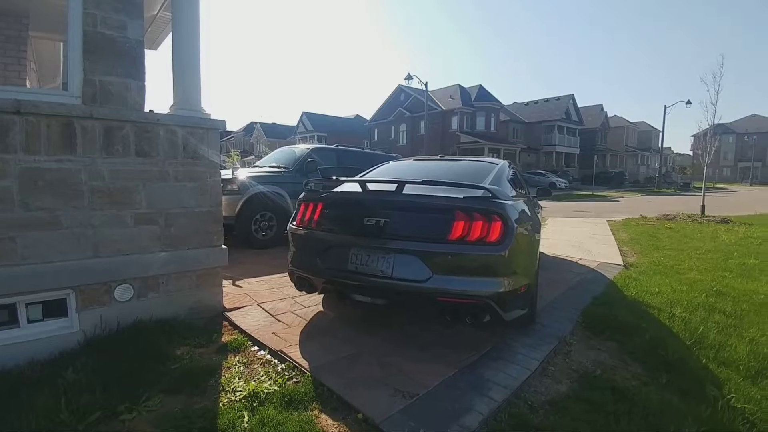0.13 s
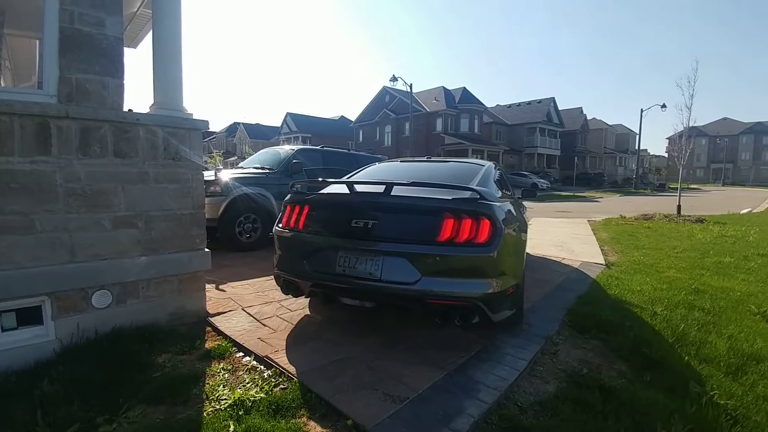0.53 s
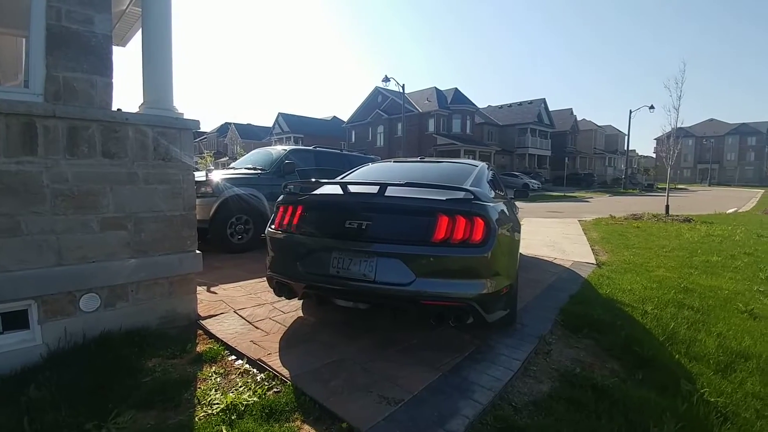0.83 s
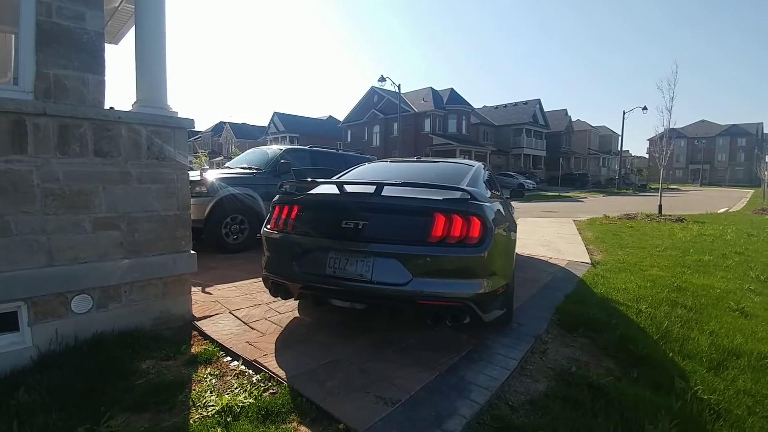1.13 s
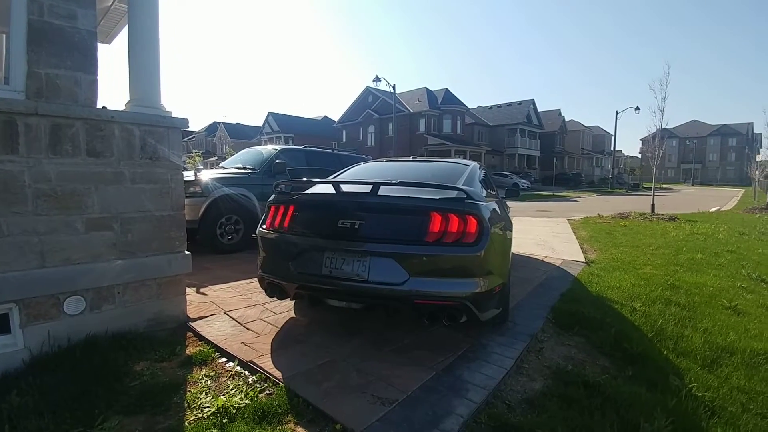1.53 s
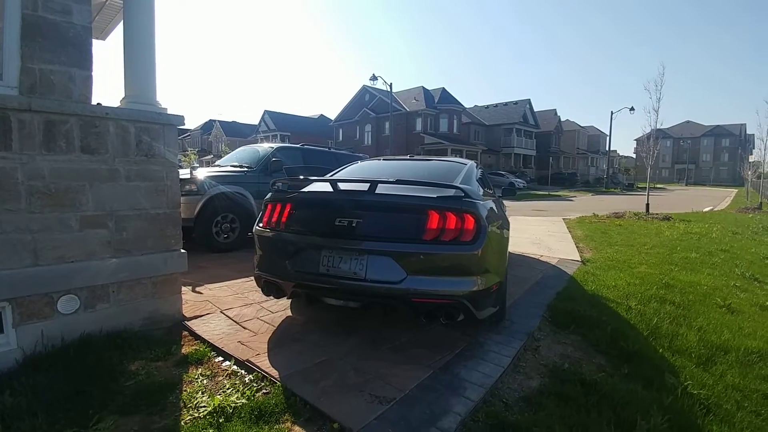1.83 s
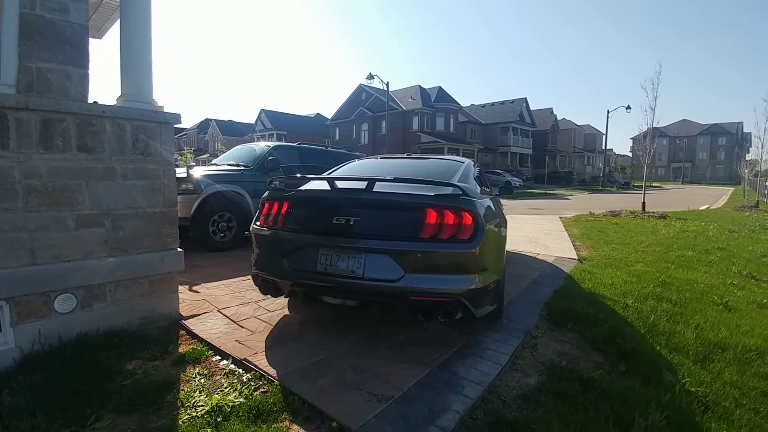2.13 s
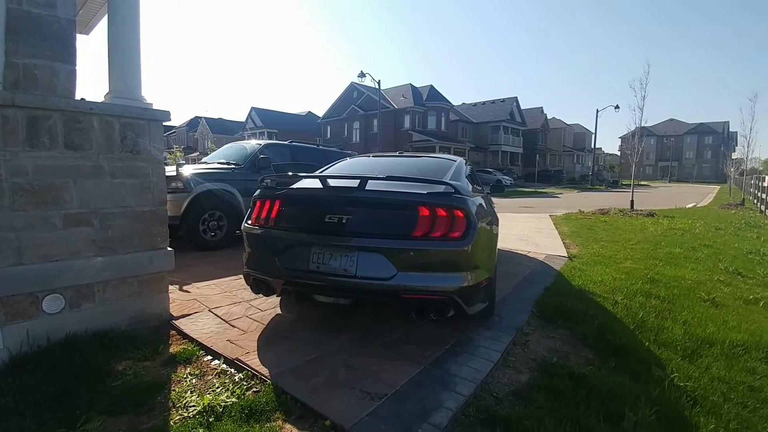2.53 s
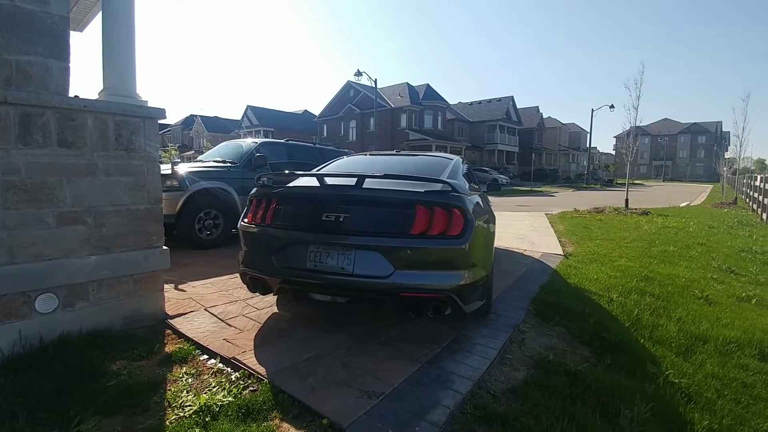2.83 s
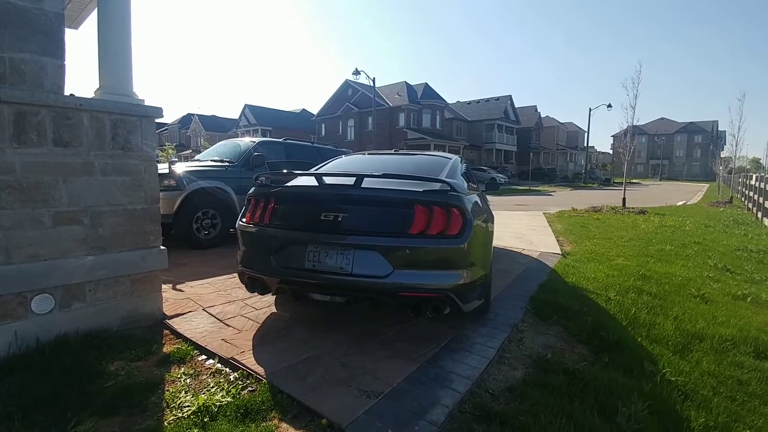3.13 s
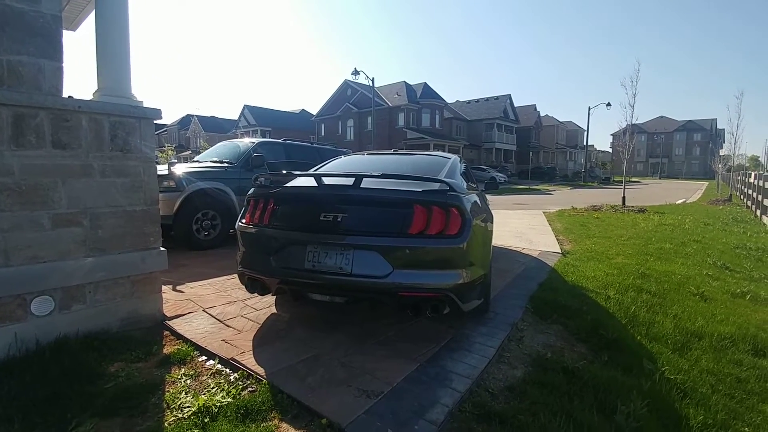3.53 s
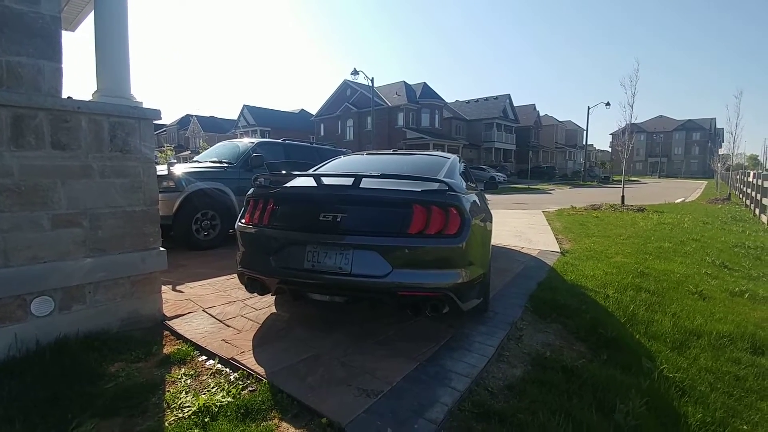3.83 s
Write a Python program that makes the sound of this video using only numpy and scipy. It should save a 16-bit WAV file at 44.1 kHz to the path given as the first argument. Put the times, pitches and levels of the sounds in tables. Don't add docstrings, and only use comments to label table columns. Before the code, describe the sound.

A V8 car starts outdoors: quiet distant traffic and small dry ticks, then a starter clunk, quickening cranking, and an explosive exhaust bark at the end, heard by a stereo phone a few metres behind.

```python
import sys
import numpy as np
from scipy import signal
from scipy.fft import rfft, irfft
from scipy.io import wavfile
from scipy.ndimage import uniform_filter1d

SR = 44100
rng = np.random.default_rng(int(sys.argv[2]) if len(sys.argv) > 2 else 0)


def to_wav(s):
    ch = np.atleast_2d(s).T
    pcm = np.round(np.clip(ch, -1, 1) * 32767)
    wavfile.write(sys.argv[1], SR, pcm.astype(np.int16))


def magnitude_from_level(level_db):
    exponent = np.asarray(level_db, float) / 20
    return 10 ** exponent


N = 176400

# [t/s, level/dB]
TRAFFIC_SWELL = [
    (0.06, -39.5),
    (0.52, -40.5),
    (0.93, -40),
    (1.769, -36.5),
    (1.78, -38),
    (2.56, -35.5),
    (2.799, -33.5),
]
# [f/Hz, level/dB]
WASH_TONE = [(140, -9), (230, -15), (351, -6.5), (434, -4.5), (818, 0), (1270, -14), (1710, -12.5),
             (2810, -31), (15500, -52)]
# [f/Hz, level/dB]
ROAD_TONE = [(15, -62), (25, -36), (45, -22.5), (70, -4), (145, -5.5), (178, -2), (330, -21), (430, -45),
             (730, -120)]
# [f/Hz, level/dB]
HISS_TONE = [(2500, -12), (4000, -20.5), (7000, 11), (11000, 9), (15500, -15)]
# [f/Hz, wander/Hz, level/dB]
FAR_ENGINE = [(90.26, 2.55, -40.5), (175.1, 1.453, -41), (358, 4.2, -49)]
# [f/Hz, likeness/0-1]
LIKENESS = [(60, 0.8), (240, 1), (950, 0.01), (3770, 0), (15000, 0.4)]
ROAD_DB, HISS_DB, TRAFFIC_PAN_DB, PATCHY_DB = -39.5, -65, 1.13, 0.8
RUMBLE_HZ, RUMBLE_WIDTH_HZ, RUMBLE_DB = 72.4, 30, -35.5
INSECT_HZ, INSECT_WIDTH_HZ, INSECT_DB, INSECT_END_S = 10100, 900, -68, 0.6

# [t/s, length/s, f/Hz, level/dB]
PEEPS = [
    (1.048, 0.046, 7000, -65.5),
    (1.554, 0.068, 6850, -57),
]
# [t/s, peak level/dB, f/Hz, pan/dB]
TWIGS = [
    (1.353, -30, 1500, 12),
    (1.475, -20, 10400, -5),
    (1.506, -33, 6650, -8),
    (1.578, -29, 7240, -11),
    (1.707, -21, 9000, -8),
    (1.7912, -30, 5800, -10),
    (1.8787, -20.5, 10900, 4),
    (1.9045, -23.5, 7800, 1),
    (2.731, -18.5, 1900, -5),
    (2.741, -16, 1510, -1),
]
TICK_CYCLES, CRACKLE_CYCLES = 4.0, 40

# [f/Hz, width/Hz, level/dB]
PUMP = [(4500, 500, 8), (7000, 940, 12.5)]
PUMP_START_S, PUMP_RISE_S, PUMP_DB = 1.9, 0.98, -66
# [f/Hz, level/dB]
SLAM_TONE = [(180, -46), (300, -25), (1110, -7), (1390, -15), (1540, -18), (2400, -14.5), (3810, -19.5),
             (7620, -9), (15500, -28.5)]
# [f/Hz, width/Hz, level/dB]
CLUNK = [(1117, 60, -7), (1580, 19, -12.5), (2450, 92, -15)]
SLAM_S, SLAM_DB, SLAM_ATTACK_S, SLAM_HOLD_S, SLAM_T60_S = 2.856, -17, 0.014, 0.014, 0.11
# [t/s, whirr level/dB]
STROKES = [(2.94, -34), (3.094, -25.5), (3.222, -24), (3.325, -22), (3.419, -22.5), (3.499, -23),
           (3.582, -21), (3.661, -23.5), (3.69, -23.5), (3.75, -12.5), (3.80, -21.5)]
STROKE_ATTACK_S, STROKE_T60_S, STROKE_DB = 0.0075, 0.18, -4.5
# [f/Hz, level/dB]
WHIRR_TONE = [(240, -42), (400, -9), (488, -5.5), (543, -48), (914, -1.5), (3970, -21.5), (6990, -13),
              (9070, -15.5), (15500, -31.5)]
# [f/Hz, width/Hz, level/dB]
HOUSING = [(576, 14, -38.5), (876, 18, -38.5), (1100, 95, -40), (1995, 45, -50), (2910, 110, -46.5),
           (7000, 230, -37)]
# [f/Hz, wander/Hz, level/dB]
WHINE = [(490, 3.0, -36.5), (595, 20.0, -45)]
WHIRR_DB, RELEASE_S, SPIN_DOWN_S = -33, 3.86, 0.054
STARTER_PAN_DB, STARTER_LIKENESS = 1.8, 0.086
# [t/s, f/Hz, level/dB]
MESH = [
    (2.92, 1041, -42.5),
    (3.076, 1086, -35),
    (3.212, 983.9, -47),
    (3.222, 1199, -41),
    (3.322, 983.9, -37),
    (3.374, 1235, -40),
    (3.464, 981, -49),
    (3.638, 1120, -50),
    (3.65, 990, -47),
]
MESH_OVERTONE, MESH_OVERTONE_DB = 1.75, -8
# [t/s, f/Hz, peak level/dB, t60/s]
PUFFS = [
    (3.092, 54, -17.5, 0.16),
    (3.222, 55.6, -24, 0.1),
    (3.245, 155.6, -24, 0.12),
    (3.295, 73, -23, 0.095),
    (3.425, 155, -25.5, 0.15),
    (3.47, 149.6, -29.5, 0.19),
    (3.479, 67, -23, 0.093),
    (3.565, 58, -21, 0.14),
    (3.621, 68, -20.5, 0.15),
]

# [t/s, crack level/dB, thump level/dB, spit
# level/dB, extra depth level/dB]
CATCHES = [(3.660, -4.5, -12.5, -15.5, -12), (3.670, -13, -20, -26, 15), (3.689, 3.5, -15, -22, -10),
           (3.696, 0.5, -9, -31, -4), (3.712, -2.5, -10.5, -18, -5), (3.7205, -14, -10, -31, -6),
           (3.729, -6, -5, -22.5, 1.5), (3.745, 3, -4.5, -13, 1.5), (3.758, 10, -7.5, -17, -9),
           (3.775, 7.5, -10.5, -13, -4), (3.786, 10.5, -9, -17.5, -3), (3.798, 7, -9, -13, -1),
           (3.811, 4.5, -4, -19, 0), (3.821, 5, -5, -20, -5.5), (3.831, 3, -10, -17.5, -7)]
# [crack level/dB, thump level/dB, spit level/dB]
CYLINDERS = [(-4.5, 0, -4), (4, 2, 4), (-3, -1, 2), (5, 2.5, -10), (0, -1, 0), (4, 6, -6), (-4, 3, -5),
             (2, 0, -3)]
STEADY_S, STEADY_COUNT = 3.8415, 18
FIRING_HZ, GAIN_HZ_PER_S, FIRING_JITTER_S = 105.9, 58, 0.0004
STEADY_CRACK_DB, STEADY_THUMP_DB, STEADY_SPIT_DB, STEADY_DEPTH_DB = 6.5, -10, -16.5, -6.5
CRACK_GROWTH_DB, THUMP_GROWTH_DB, SPIT_GROWTH_DB = 0.5, 0.18, 0.38
# [f/Hz, level/dB, t60/s]
BOOM = [(58, 7.5, 0.11), (133, -3.5, 0.09), (171, 1.5, 0.057), (188.5, 0, 0.082), (225.2, 3, 0.072),
        (288, 0, 0.09), (362, -11, 0.035)]
# [f/Hz, level/dB, t60/s]
CRACK = [(500, -4, 0.035), (647, -4, 0.033), (807, 2, .016), (1020, 4, 0.02), (1200, -6.5, 0.014),
         (1568, -11, 0.032), (3490, -11, 0.022)]
# [f/Hz, level/dB, t60/s]
TIPS = [(2308, -2.5, 0.0094), (2573, -4, 0.011)]
# [delay/s, left level/dB, right level/dB]
ECHOES = [(.0043, -11, -22), (.011, -5.5, -20), (.027, -10, -7.5)]
BOOM_LAG_S, BOOM_SCATTER_DB, PUSH_S = 0.0018, 2.8, 0.00045
CRACK_STAGGER_S, SCATTER_DB, PIPE_SPREAD_DB = 0.001613, 3, 3
RASP_DB, RASP_T60_S, RASP_CUT_HZ, RASP_SIDE = -13, 0.025, 1020, 0.21
JET_DB, JET_T60_S = -32, 0.033
SPIT_HZ, SPIT_WIDTH_HZ, SPIT_T60_S, SPIT_PAN_DB = 2510, 380, 0.03, 1.5
EXHAUST_PAN_DB = 0.2

# [f/Hz, width/Hz, level/dB]
MIC_COLOUR = [(417, 70.6, -8.5), (1200, 450, -1.5), (2380, 140, 1.5), (3200, 2100, -1.5),
              (9000, 1080, -11.5), (14150, 6340, -10)]
# [f/Hz, width/Hz, left minus right level/dB]
PORT_BALANCE = [(2190, 1700, 5.5), (4970, 6500, -5), (13700, 7300, 12.5)]
OPEN_S, OPEN_FADE_S, MIC_LOW_HZ = 0.037, 0.012, 47.4
LIMIT, LIMIT_RELEASE_DB_PER_S, CEILING = 1.34, 316, 0.97


def t_s():
    return np.arange(N) / SR


def rms_one(x):
    return x / np.sqrt(np.mean(x ** 2) + 1e-20)


def at_hz(points, hz):
    table_hz, value = np.array(points).T[:2]
    return np.interp(np.log(hz), np.log(table_hz), value)


def drift(rate):
    r = np.exp(-80 * np.pi * rate / SR)
    slow = signal.lfilter([1], [1, -2 * r, r * r], rng.standard_normal(N // 40 + 2002))[2000:]
    return np.interp(np.arange(N) / 40, np.arange(len(slow)), rms_one(slow))


def ring(x, hz, t60):
    r, w = magnitude_from_level(-60 / (t60 * SR)), 2 * np.pi * hz / SR
    return signal.lfilter([0, np.sin(w)], [1, -2 * r * np.cos(w), r * r], x + 1e-18)


def bloom(x, hz, t60):
    return ring(ring(x, hz, t60), hz, t60) * 2 * np.e * np.log(1000) / (t60 * SR)


def clicks(s, sizes):
    out = np.zeros(np.shape(sizes)[:-1] + (N,))
    out[..., np.minimum((np.asarray(s) * SR).astype(int), N - 1)] = sizes
    return out


def swell(train, attack, t60):
    a, r = np.exp(-1 / (attack * SR)), magnitude_from_level(-60 / (t60 * SR))
    tails = signal.lfilter([1], [1, -r], train + 1e-18)
    return signal.lfilter([1 - a], [1, -a], tails)


def hum(rows, alike):
    out = 0
    for hz, width, level_db in rows:
        mid, side = ring(rng.standard_normal((2, N)), hz, 2.2 / width)
        pair = mid + np.sqrt(1 - np.clip(alike, 0, 1)) * side * [[1], [-1]]
        out = out + magnitude_from_level(level_db) * rms_one(pair)
    return out


def noise(tone, alike=None, patchy_db=0):
    hz = np.maximum(np.arange(N // 2 + 1) * SR / N, 1)
    c = np.clip(at_hz(LIKENESS, hz) if alike is None else alike, 0, 1)
    mid, side = rfft(rng.standard_normal((2, N))) * magnitude_from_level(at_hz(tone, hz)) * (hz > 0.7 * tone[0][0])
    pair = np.sqrt(1 + c) * mid + np.sqrt(1 - c) * side * [[1], [-1]]
    out, shared = 0, drift(8.4)
    for octave in range(5, 15, 2):
        share = np.clip(1 - np.abs(np.clip(np.log2(hz), 5, 13) - octave) / 2, 0, 1)
        out = out + irfft(pair * share, N) * magnitude_from_level(patchy_db * (shared + 0.7 * drift(15)))
    return rms_one(out)


def wavering(rows):
    out = 0
    for hz, wander, db in rows:
        level = magnitude_from_level(db + 2.7 * drift(3.0))
        out = out + level * np.sin(2 * np.pi * np.cumsum(hz + wander * drift(2.41)) / SR)
    return out


def pan(db):
    return magnitude_from_level(np.array([[db / 2], [-db / 2]]))


def street():
    s, db = np.transpose(TRAFFIC_SWELL)
    level = magnitude_from_level(np.interp(t_s(), s, db) + 4.0)
    wash = level * pan(TRAFFIC_PAN_DB) * noise(WASH_TONE, patchy_db=PATCHY_DB)
    hiss = magnitude_from_level(HISS_DB) * noise(HISS_TONE, 0.092)
    road = magnitude_from_level(ROAD_DB) * noise(ROAD_TONE, 0.91, patchy_db=-0.5)
    rumble = hum([(RUMBLE_HZ, RUMBLE_WIDTH_HZ, RUMBLE_DB)], alike=0.96) * magnitude_from_level(0.78 * drift(5.2))
    return wash + hiss + pan(1.4) * (road + rumble + wavering(FAR_ENGINE))


def insect():
    buzz = hum([(INSECT_HZ, INSECT_WIDTH_HZ, INSECT_DB)], alike=0.3)
    return buzz * magnitude_from_level(5.7 * drift(30)) * (t_s() < INSECT_END_S)


def bird_peeps():
    out, t = 0, t_s()
    for s, length, hz, db in PEEPS:
        breath = np.sin(np.pi * np.clip((t - s) / length, 0, 1)) ** 2
        out = out + magnitude_from_level(db) * breath * np.sin(2 * np.pi * hz * t) * pan(4)
    return out


def twig_ticks():
    out = 0
    for s, db, hz, pan_db in TWIGS:
        crackle = swell(clicks([s], [magnitude_from_level(db)]), 0.0001, CRACKLE_CYCLES / hz) * rng.standard_normal((2, N))
        t60 = TICK_CYCLES / hz
        snap = ring(ring(crackle, hz, t60), hz, t60)
        out = out + pan(pan_db) * snap * (hz / SR) ** 1.04
    return out


def fuel_pump():
    rise = np.clip((t_s() - PUMP_START_S) / PUMP_RISE_S, 0, 1)
    return magnitude_from_level(PUMP_DB) * rise * hum(PUMP, alike=0.21)


def pinion_slam():
    since = t_s() - SLAM_S
    attack = np.clip(since / SLAM_ATTACK_S, 0, 1)
    decay = magnitude_from_level(-60 * np.clip(since - SLAM_ATTACK_S - SLAM_HOLD_S, 0, 1) / SLAM_T60_S)
    metal = noise(SLAM_TONE, STARTER_LIKENESS, patchy_db=-0.5) + hum(CLUNK, alike=0.58)
    return pan(STARTER_PAN_DB) * magnitude_from_level(SLAM_DB) * attack * decay * metal * magnitude_from_level(0.83 * drift(130))


def starter():
    t = t_s()
    turning = (t > SLAM_S) * np.exp(-np.clip(t - RELEASE_S, 0, 1) / SPIN_DOWN_S)
    s, db = np.transpose(STROKES)
    load = swell(clicks(s - STROKE_ATTACK_S, magnitude_from_level(db)), STROKE_ATTACK_S, STROKE_T60_S)
    whirr = noise(WHIRR_TONE, STARTER_LIKENESS, patchy_db=PATCHY_DB) * magnitude_from_level(1.25 * drift(130))
    whirr = (magnitude_from_level(WHIRR_DB) + magnitude_from_level(STROKE_DB) * load) * whirr
    effort = 0.5 + magnitude_from_level(23.5) * load
    housing = hum(HOUSING, alike=0.36) * effort * magnitude_from_level(1.7 * drift(26))
    return pan(STARTER_PAN_DB) * turning * (whirr + housing + wavering(WHINE) + gear_mesh())


def gear_mesh():
    s, hz, db = np.transpose(MESH)
    pitch = np.interp(t_s(), s, hz) * (1 + 0.0119 * drift(25.3))
    turn = 2 * np.pi * np.cumsum(pitch) / SR
    level = magnitude_from_level(np.interp(t_s(), s, db) + 1 + 3.9 * drift(22))
    return level * (np.sin(turn) + magnitude_from_level(MESH_OVERTONE_DB) * np.sin(MESH_OVERTONE * turn))


def pipe_puffs():
    return sum(bloom(clicks([s], [-magnitude_from_level(db)]), hz, t60) for s, hz, db, t60 in PUFFS)


def firings():
    k = np.arange(STEADY_COUNT)
    s = STEADY_S + (np.sqrt(FIRING_HZ ** 2 + 2 * GAIN_HZ_PER_S * k) - FIRING_HZ) / GAIN_HZ_PER_S
    s = s + FIRING_JITTER_S * rng.standard_normal(STEADY_COUNT)
    crack, thump, spit = np.array(CYLINDERS)[k % 8].T
    crack = STEADY_CRACK_DB + CRACK_GROWTH_DB * k + crack
    thump = STEADY_THUMP_DB + THUMP_GROWTH_DB * k + thump
    spit = STEADY_SPIT_DB + SPIT_GROWTH_DB * k + spit
    depth = np.full(STEADY_COUNT, STEADY_DEPTH_DB)
    return np.vstack([CATCHES, np.transpose([s, crack, thump, spit, depth])])


def pipe_boom(s, thump_db, depth_db):
    boom = 0
    for k, (hz, db, t60) in enumerate(BOOM):
        level_db = thump_db + db + BOOM_SCATTER_DB * rng.standard_normal(len(s))
        level_db = level_db + depth_db * (k == 0)
        boom = boom + ring(clicks(s + BOOM_LAG_S, -magnitude_from_level(level_db)), hz, t60)
    soft = np.exp(-1 / (PUSH_S * SR))
    return signal.lfilter([(1 - soft) ** 2], [1, -2 * soft, soft ** 2], boom)


def pipe_crack(s, crack_db):
    crack = 0
    for hz, db, t60 in CRACK:
        shared, ears = rng.standard_normal(len(s)), rng.standard_normal((2, len(s)))
        late = CRACK_STAGGER_S * np.abs(rng.standard_normal(len(s)))
        level_db = crack_db + db - 9.5 + SCATTER_DB * shared + PIPE_SPREAD_DB * ears
        crack = crack + ring(clicks(s + late, -magnitude_from_level(level_db)), hz, t60)
    return signal.lfilter([0.04], [1, -1.6, 0.64], crack)


def tip_spit(s, spit_db):
    spit = hum([(SPIT_HZ, SPIT_WIDTH_HZ, 0)], alike=0.17)
    spit = spit * swell(clicks(s, magnitude_from_level(spit_db - 3.5)), 0.0032, SPIT_T60_S)
    for hz, db, t60 in TIPS:
        whistle_db = spit_db + db + SCATTER_DB * rng.standard_normal(len(s))
        spit = spit + bloom(clicks(s, magnitude_from_level(whistle_db)), hz, t60)
    return pan(SPIT_PAN_DB) * spit


def gas_noise(s, crack_db):
    train, white = clicks(s, magnitude_from_level(crack_db)), rng.standard_normal((2, N))
    rasp_band = signal.butter(2, [400, RASP_CUT_HZ], "band", fs=SR, output="sos")
    jet_band = signal.butter(1, [2000, 7000], "band", fs=SR, output="sos")
    rasp = rms_one(signal.sosfilt(rasp_band, white[0] + RASP_SIDE * white[1] * [[1], [-1]]))
    jet = rms_one(signal.sosfilt(jet_band, white))
    rasp = magnitude_from_level(RASP_DB) * swell(train, 0.0021, RASP_T60_S) * rasp
    return rasp + magnitude_from_level(JET_DB) * swell(train, 0.0029, JET_T60_S) * jet


def exhaust():
    s, crack_db, thump_db, spit_db, depth_db = firings().T
    bark = pipe_crack(s, crack_db) + tip_spit(s, spit_db) + gas_noise(s, crack_db)
    out = bark + pipe_boom(s, thump_db, depth_db)
    for lag, left_db, right_db in ECHOES:
        late = np.pad(bark, ((0, 0), (int(lag * SR), 0)))[:, :N]
        out = out + magnitude_from_level(np.array([[left_db], [right_db]])) * late
    return pan(EXHAUST_PAN_DB) * out


def scene():
    surroundings = street() + insect() + bird_peeps() + twig_ticks()
    cranking = fuel_pump() + pinion_slam() + starter() + pipe_puffs()
    return surroundings + cranking + exhaust()


def lift(x, hz, width, db):
    a, g, c = np.pi * width / SR, magnitude_from_level(db / 2), -2 * np.cos(2 * np.pi * hz / SR)
    return signal.lfilter([1 + a * g, c, 1 - a * g], [1 + a / g, c, 1 - a / g], x)


def low_pass(x):
    return signal.sosfilt(signal.butter(12, 15820, fs=SR, output="sos"), x)


def record(dry):
    x = signal.sosfilt(signal.butter(4, MIC_LOW_HZ, "high", fs=SR, output="sos"), dry)
    for hz, width, db in MIC_COLOUR:
        x = lift(x, hz, width, db)
    for hz, width, db in PORT_BALANCE:
        x = np.array([lift(x[0], hz, width, db / 2), lift(x[1], hz, width, -db / 2)])
    over_db = np.maximum(20 * np.log10(np.abs(x).max(axis=0) / LIMIT + 1e-9), 0)
    ramp = LIMIT_RELEASE_DB_PER_S * t_s()
    cut_db = np.maximum.accumulate(over_db + ramp) - ramp
    x = x * magnitude_from_level(-uniform_filter1d(cut_db, size=90))
    x = x / (1 + np.abs(x / CEILING) ** 4) ** 0.25
    mix = x * np.clip((t_s() - OPEN_S) / OPEN_FADE_S, 0, 1)
    return low_pass(mix)


dry = scene()
out = record(dry)
to_wav(out)
```